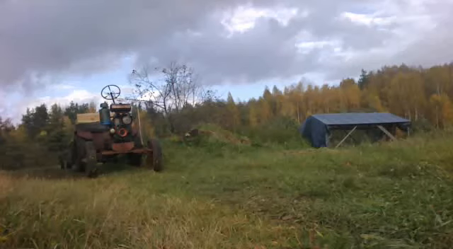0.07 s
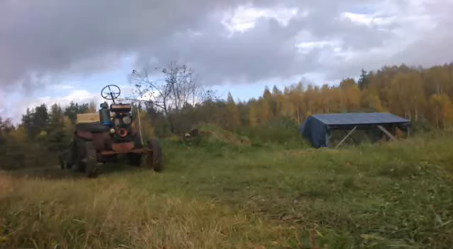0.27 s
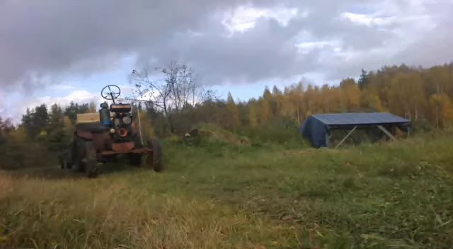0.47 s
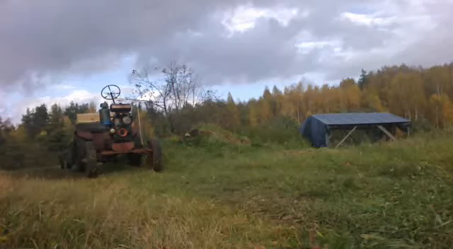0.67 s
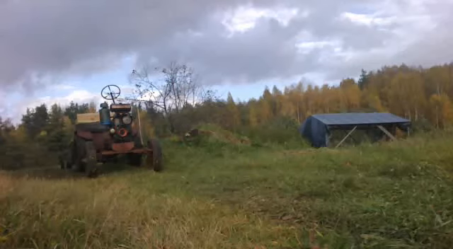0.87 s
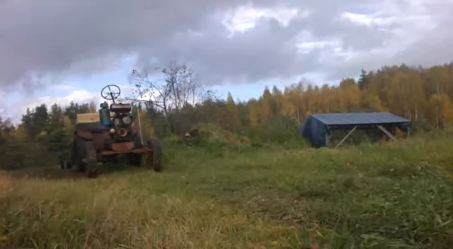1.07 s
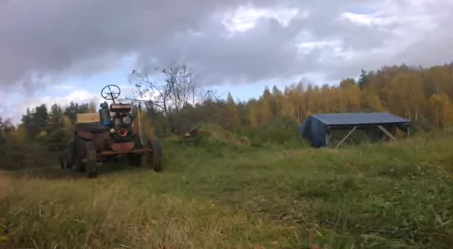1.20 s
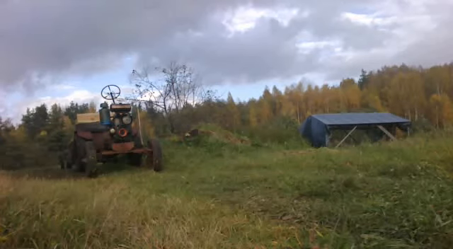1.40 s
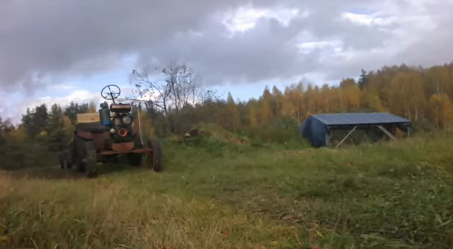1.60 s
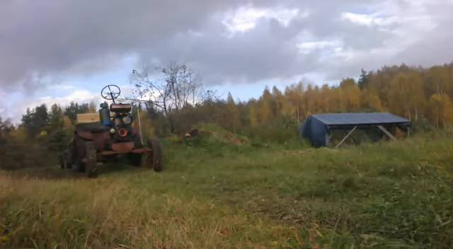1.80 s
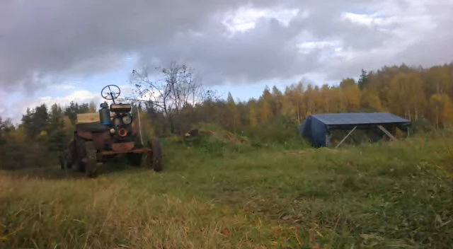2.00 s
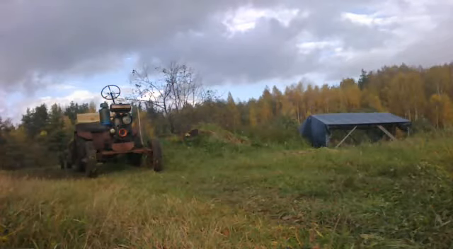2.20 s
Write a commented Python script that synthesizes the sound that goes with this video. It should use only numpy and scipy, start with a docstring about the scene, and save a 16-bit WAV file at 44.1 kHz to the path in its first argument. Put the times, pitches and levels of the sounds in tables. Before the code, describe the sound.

Wind bumps the microphone in soft, low, uneven thumps in an open field. Dry grass then swishes faintly close by in growing waves, with a few tiny stalk snaps and a light twig tick over quiet air.

```python
"""Soft, low thumps of wind bump the microphone in an open field on a breezy day.
Each thump is an eddy rebounding in the microphone's bass cut. Dry grass swishes close by in growing
waves of tiny blade contacts, with a few sizzling blades, snapping stalks and a twig's double tick.
A faint low moan comes and goes over the quiet air, and a thin rasp rises at the end."""
import sys
import numpy as np
from scipy import signal
from scipy.fft import rfft, irfft
from scipy.io import wavfile
from scipy.ndimage import uniform_filter1d

SR = 44100
rng = np.random.default_rng(int(sys.argv[2]) if len(sys.argv) > 2 else 0)


def transcribe(u):
    """Save the signal u as a 16-bit wav file named by the first command-line argument.

    u: samples, shape (n,) or (channels, n), limited to [-1, 1]; the rate is SR.
    q: integer samples, one column per channel.
    """
    v = np.clip(np.atleast_2d(u).T, -1, 1)
    q = np.round(v * 32767).astype(np.int16)
    wavfile.write(sys.argv[1], SR, q)


N = 99225


def amp(db):
    """Decibels to gain."""
    return 10 ** (np.asarray(db) / 20)


def unit(x):
    """Scales to rms 1."""
    return x / np.sqrt(np.mean(x ** 2) + 1e-20)


def level(points):
    """Gain at every sample from (s, dB) points."""
    return amp(np.interp(np.arange(N) / SR, *np.transpose(points)))


def colour(x, points):
    """Filters x by a (Hz, dB) spectrum; rms 1."""
    hz, db = np.transpose(points)
    f = np.fft.rfftfreq(N, 1 / SR)
    return unit(irfft(rfft(x) * amp(np.interp(np.log(f + 1), np.log(hz + 1), db)), N))


def drift(rate):
    """Slow random motion up to a rate per second; rms 1."""
    f = np.fft.rfftfreq(N, 1 / SR)
    return unit(irfft(rfft(rng.standard_normal(N)) * (f > 0) / (1 + (f / rate) ** 4), N))


def patchy(x, depth_db):
    """Lets small patches of time and frequency swell and fade."""
    z = signal.stft(x, nperseg=256)[2]
    field = uniform_filter1d(rng.standard_normal(z.shape), size=7, axis=0)
    field = uniform_filter1d(field, size=7, axis=1)
    return unit(signal.istft(z * amp(depth_db * unit(field)), nperseg=256)[1][:N])


def add(mix, s, sound):
    """Mixes a sound in at time s."""
    part = mix[max(round(s * SR), 0):][:len(sound)]
    part += sound[:len(part)]


# Eddies striking the microphone. Each row: centre in seconds, strength in dB, half width in seconds.
EDDIES = [(.234, -30.5, 0.0024), (.250, -34, 0.0016), (.276, -40.5, 0.0023), (0.3, -34.5, 0.0048),
          (.346, -30, 0.0034), (0.365, -31, 0.0019), (0.399, -33.5, 0.0022), (0.416, -28, 0.0073),
          (0.453, -29, 0.0035), (.561, -36, 0.0052), (.625, -47, 0.0077), (0.711, -48.5, 0.011),
          (.800, -45.5, 0.011), (0.872, -39.5, 0.0032), (0.893, -36, 0.0069), (1.037, -30, 0.0044),
          (1.062, -44, 0.0022), (1.204, -51, 0.0079), (1.32, -48, 0.015), (1.438, -34.5, 0.0031),
          (1.47, -32, 0.00264), (1.555, -45, 0.0029), (1.607, -43.5, 0.0041), (1.792, -46, 0.0055),
          (1.924, -41, .0055), (1.963, -35, 0.0045), (2.061, -49, 0.02), (2.155, -46.5, 0.013)]
# The swell of the turbulence. Each row: time in seconds, level in dB.
BUFFET = [(0, -72.5), (.14, -72.5), (.22, -57.5), (.32, -56), (.5, -51), (.62, -50.5), (.69, -65.5),
          (.85, -59.5), (.98, -59.5), (1.12, -65), (1.19, -58), (1.27, -60), (1.37, -60), (1.45, -48),
          (1.64, -52), (1.71, -66.5), (1.86, -63.5), (1.94, -49.5), (2.11, -68), (2.25, -61)]
# Its deep rumble. Each row: frequency in Hz, relative level in dB.
BUFFET_COLOUR = [(10, -24.5), (25, 0), (42, 3.5), (65, -10), (100, -16.5), (160, -32.5), (300, -38),
                 (800, -92)]
MIC_LOW_HZ, MIC_WIDTH_HZ, EDDY_TOP_HZ = 39.2, 32.6, 185  # bass cut, its width, top of the thumps


def wind():
    """Each eddy is a brief push that rebounds in the microphone's bass cut; turbulence fills the gaps."""
    t, f = np.arange(N) / SR, np.fft.rfftfreq(N, 1 / SR)
    bass_cut = signal.bilinear([1, 0, 0], [1, 2 * np.pi * MIC_WIDTH_HZ, (2 * np.pi * MIC_LOW_HZ) ** 2], SR)
    thumps = np.zeros(N)
    for s, db, width in EDDIES:
        push = 1 / (1 + ((t - s) / width) ** 2 / 2) ** 2
        bump = signal.lfilter(*bass_cut, push)
        thumps += amp(db) * bump / abs(bump).max()
    thumps = irfft(rfft(thumps) / np.sqrt(1 + (f / EDDY_TOP_HZ) ** 4), N)
    churn = colour(rng.standard_normal(N), BUFFET_COLOUR)
    churn /= np.sqrt(uniform_filter1d(churn ** 2, size=3500) + 0.071)  # even out chance swells
    return thumps + churn * level(BUFFET)


GRAINS_PER_S, GRAIN_SPREAD_DB = 2500, 3.5  # blade contacts and how much their sizes differ


def blades(spectrum, grainy, flutter_db, patch_db):
    """Countless tiny blade contacts over a smooth hiss, arriving in clumps."""
    sizes = amp(GRAIN_SPREAD_DB * np.minimum(rng.exponential(1, N), 4)) * rng.choice([-1, 1], N)
    grains = unit(sizes * (rng.random(N) < GRAINS_PER_S / SR))
    share = np.clip(grainy, 0, 1)
    drive = np.sqrt(share) * grains + np.sqrt(1 - share) * rng.standard_normal(N)
    return patchy(colour(drive, spectrum), patch_db) * amp(flutter_db * drift(70))


# Fader moves for the grass's body, swish and fizz. Each row: time in seconds, level in dB before trim.
BODY = [(0, -103), (.5, -83.5), (.7, -82.5), (.78, -75.5), (.93, -75), (.98, -78.5), (1.07, -73),
        (1.15, -80), (1.35, -77.5), (1.45, -74), (1.57, -73), (1.7, -79.5), (1.87, -84), (1.96, -69),
        (2.05, -74), (2.19, -69), (2.25, -79)]
SWISH = [(0, -85), (.08, -80), (.13, -100), (.48, -86.5), (.56, -80), (.71, -78), (.79, -69.5),
         (.856, -63.5), (.9, -68.5), (.99, -70), (1.055, -73.5), (1.09, -64), (1.14, -81.5), (1.25, -78),
         (1.38, -74), (1.44, -64.5), (1.56, -69), (1.6, -64.5), (1.68, -70.5), (1.73, -67), (1.8, -71),
         (1.88, -72.5), (1.92, -64.5), (1.995, -64), (2.04, -68), (2.075, -66), (2.15, -66), (2.19, -63),
         (2.25, -65)]
FIZZ = [(.7, -100), (.85, -73), (.96, -91), (1.03, -87), (1.09, -78), (1.2, -88), (1.3, -79), (1.38, -78),
        (1.495, -62), (1.56, -71.5), (1.62, -67), (1.72, -70), (1.77, -74), (1.895, -72.5), (1.92, -63.5),
        (2.01, -58.5), (2.045, -72), (2.14, -63.5), (2.19, -57), (2.22, -57), (2.25, -62)]
# The tone of each layer, dull to bright. Each row: frequency in Hz, relative level in dB.
BODY_COLOUR = [(150, -3), (300, -0.5), (600, -2), (1200, -7.5), (2200, -6), (3500, -14.5), (7000, -44.5)]
SWISH_COLOUR = [(1500, -22.5), (2800, -11), (4000, -2), (7000, 2), (9500, 0), (12000, -10), (15500, -25.5)]
FIZZ_COLOUR = [(5000, -17), (8500, -7.5), (11500, 0.5), (14000, -4.5), (15700, -2)]
BODY_TRIM_DB, SWISH_TRIM_DB, FIZZ_TRIM_DB = 0.5, -1, 0.5


def grass():
    """Dry blades brush together: a dull body, a swish and a fine fizz on top."""
    body = level(BODY) * blades(BODY_COLOUR, grainy=0.41, flutter_db=1.5, patch_db=1.5)
    swish = level(SWISH) * blades(SWISH_COLOUR, grainy=0.4, flutter_db=0.95, patch_db=1.5)
    fizz = level(FIZZ) * blades(FIZZ_COLOUR, grainy=0.27, flutter_db=1.7, patch_db=-1.0)
    return amp(BODY_TRIM_DB) * body + amp(SWISH_TRIM_DB) * swish + amp(FIZZ_TRIM_DB) * fizz


# Single blades sliding past. Each row: start in seconds, length in seconds, level in dB.
SIZZLES = [(1.622, 0.12, -67), (1.91, .11, -82), (2.167, 0.066, -61)]
# Their very high sheen. Each row: frequency in Hz, relative level in dB.
SIZZLE_COLOUR = [(9000, -30), (12000, -19), (14200, -5), (15700, -6)]
SIZZLE_EDGE_S = 0.016


def sizzle():
    """Each sliding blade gives an even hiss that starts and stops abruptly."""
    gain, t = np.zeros(N), np.arange(N) / SR
    for s, length, db in SIZZLES:
        inside_s = np.minimum(t - s, s + length - t)
        gain += amp(db) * np.clip(inside_s / SIZZLE_EDGE_S + .5, 0, 1)
    return gain * colour(rng.standard_normal(N), SIZZLE_COLOUR)


# Stalks snapping. Each row: start in seconds, peak level in dB, band centre in Hz.
SNAPS = [(0.55, -60.5, 3970), (.583, -71, 8000), (.976, -70, 12000), (1.177, -55, 7800), (1.285, -52, 9800),
         (1.347, -58, 8000), (1.589, -49, 11900), (2.0666, -48, 4860)]
SNAP_FADE_S, SNAP_OCTAVES = 0.00084, 0.71


def stalks():
    """Each stalk snaps with a very short crack in its own band."""
    out, t = np.zeros(N), np.arange(512) / SR
    f = np.fft.rfftfreq(len(t), 1 / SR)
    for s, db, hz in SNAPS:
        band = np.exp(-.5 * (np.log2((f + 1) / hz) / SNAP_OCTAVES) ** 2)
        crack = irfft(rfft(rng.standard_normal(len(t))) * band) * np.exp(-t / SNAP_FADE_S)
        add(out, s, amp(db) * crack / abs(crack).max())
    return out


# The double tick. Each row: start in seconds, peak level in dB.
TICKS = [(1.744, -53), (1.7491, -45)]
# The twig's ring. Each row: frequency in Hz, relative level in dB, seconds to fade by 60 dB.
TWIG_MODES = [(740, -6, 0.018), (1010, 2, 0.0079), (1370, -5.5, 0.015), (2460, -3, 0.0048),
              (4400, -12, .003)]


def twig():
    """Two light ticks ring the same quickly damped modes of a twig."""
    out, t = np.zeros(N), np.arange(SR // 20) / SR
    ring = sum(amp(db) * np.exp(-np.log(1000) * t / t60) * np.sin(2 * np.pi * hz * t)
               for hz, db, t60 in TWIG_MODES)
    for s, db in TICKS:
        add(out, s, amp(db) * ring / abs(ring).max())
    return out


# The rasp's closing rise. Each row: time in seconds, level in dB.
RASP = [(2.15, -78), (2.2, -70.5), (2.236, -63), (2.25, -61.5)]
# Its thin tone. Each row: frequency in Hz, relative level in dB.
RASP_COLOUR = [(700, -27), (1040, -11), (1220, -6.5), (1420, -14), (1670, -12.5), (2100, -24.5)]


def rasp():
    """Steady rubbing in a narrow resonance."""
    rub = colour(rng.standard_normal(N), RASP_COLOUR)
    running_rms = np.sqrt(uniform_filter1d(rub ** 2, size=900) + 1e-9)
    return level(RASP) * rub / running_rms


# The moan coming and going. Each row: time in seconds, level in dB.
MOAN = [(.45, -89), (.56, -82.5), (.86, -81.5), (.96, -87), (1.04, -70), (1.13, -83.5), (1.32, -75.5),
        (1.49, -69), (1.62, -73), (1.69, -94)]
MOAN_HZ, MOAN_WAVER = 313, 0.061  # pitch, and the fraction by which it wanders


def moan():
    """A faint low tone far off, wavering in pitch and level."""
    cycles = np.cumsum(MOAN_HZ * (1 + MOAN_WAVER * drift(27))) / SR
    tremble = 1 + 0.7 * drift(32)
    return level(MOAN) * unit(np.sin(2 * np.pi * cycles) * tremble)


# The dark bed of open air. Each row: frequency in Hz, relative level in dB.
AIR_COLOUR = [(70, 4.5), (150, 7), (280, 0.5), (420, -4), (750, -6.5), (1100, -19), (2300, -14),
              (4500, -17), (9000, -22), (15500, -26.5)]
AIR_DB = -72


def air():
    """The steady hush of the field and far trees."""
    return amp(AIR_DB) * patchy(colour(rng.standard_normal(N), AIR_COLOUR), depth_db=2.25)


def scene():
    """Wind, grass and small details over the field's hush, at one microphone."""
    return (wind() + air() + grass() + sizzle() + stalks() + twig() + moan() + rasp())[None]


EDGE_HZ = 15720


def record(dry):
    """The recorder's band limit shaves off the highest treble."""
    taps = signal.firwin(801, EDGE_HZ, window=("kaiser", 9), fs=SR)
    return signal.oaconvolve(dry, taps[None], "same")


dry = scene()
out = record(dry)
transcribe(out)
```